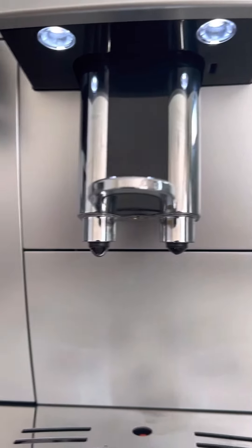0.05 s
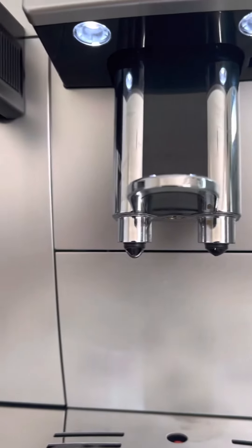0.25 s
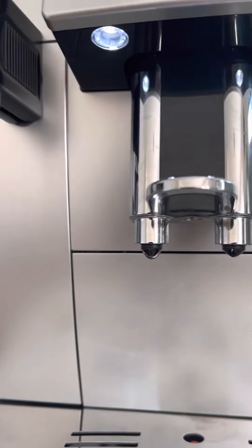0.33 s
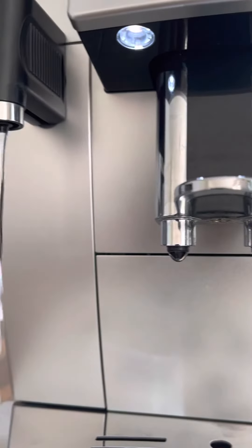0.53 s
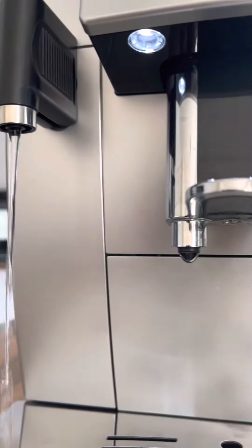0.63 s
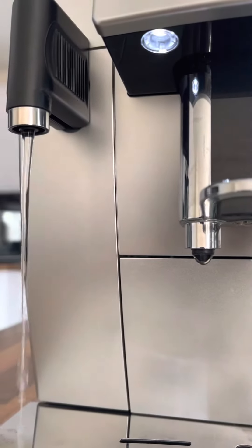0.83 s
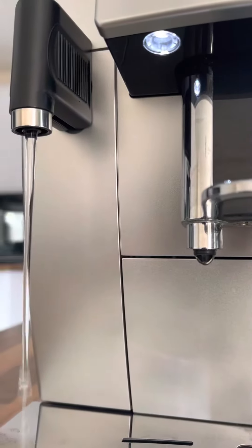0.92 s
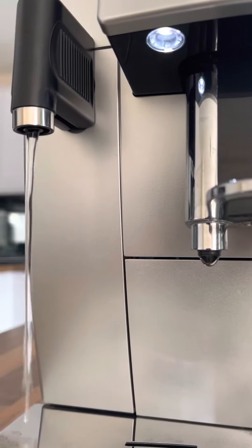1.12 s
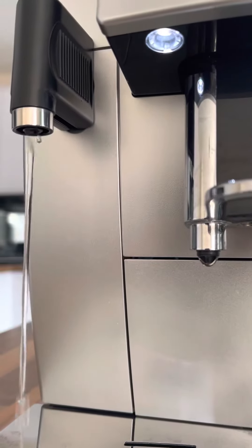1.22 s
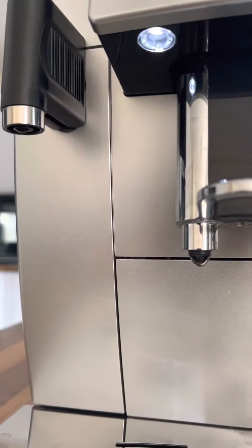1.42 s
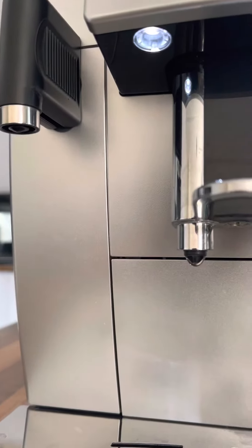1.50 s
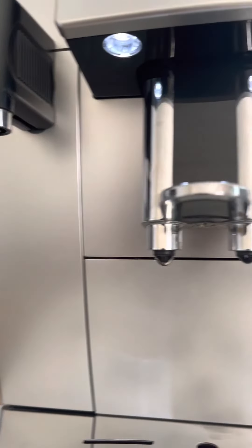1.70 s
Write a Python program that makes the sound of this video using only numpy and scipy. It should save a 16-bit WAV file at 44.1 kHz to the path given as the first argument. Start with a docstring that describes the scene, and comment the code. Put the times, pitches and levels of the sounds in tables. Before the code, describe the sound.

Heard close up in a small kitchen, a vibrating coffee machine pump hums and rattles in repeated bursts as water dribbles and the spout spits; a valve shuts with a clunk and the trickle fades.

```python
"""A kitchen, close to a coffee machine dosing hot water: its vibrating pump buzzes in short bursts.
The pump adds a humming casing to noise bursts for the piston and valve, one per mains cycle.
Water trickles as splashing noise with rising bubble tones; the spout spits wobbly rings and spray.
A valve shuts with two noisy cracks and a casing ring; dull taps and a low rumble complete the scene.
All is heard through two closely spaced microphone ports."""
import sys
import numpy as np
from scipy import signal
from scipy.fft import rfft, irfft, next_fast_len
from scipy.io import wavfile
from scipy.ndimage import map_coordinates

SR = 44100
rng = np.random.default_rng(int(sys.argv[2]) if len(sys.argv) > 2 else 0)


def wav_out(sig):
    """Save sig, one row per channel (or a flat mono array), as 16-bit PCM at SR to the path in sys.argv[1]."""
    wavfile.write(sys.argv[1], SR, np.round(np.clip(np.atleast_2d(sig).T, -1, 1) * 32767).astype(np.int16))


N = 77175
T = np.arange(N) / SR  # time of every sample, in seconds

# Pump bursts, the first already dying away: first_stroke_s, relative_level_db
PUMP_BURSTS = [(-.285, -3.5), (0.213, -2.5), (0.7128, -2.5)]
STROKES_PER_BURST, MAINS_HZ = 12, 50
# Weak first strokes, time to prime, and a plus-or-minus step that makes every second stroke stronger
SOFT_START_DB, PRIME_S, LIMP_DB = 1, .025, 1.6
SCATTER_DB, JITTER_S = 2.33, .0001  # chance in the force and timing of each stroke

# Casing hum: multiple_of_half_stroke_rate, level_db
HUM_LINES = [(2, -53), (3, -54), (4, -50), (5, -47), (6, -36), (7, -48), (8, -42), (9, -48), (10, -50),
             (11, -51), (12, -52), (14, -48), (18, -54), (20, -46), (22, -45)]
HUM_LAG_S, HUM_RISE_S, HUM_T60_S = 0.014016, 0.015, 0.33  # T60: time to fall by 60 dB
HUM_WAVER_DB, HUM_WAVERS_PER_S = 2, 25  # each line swells and sinks by itself

# Tone colour of the piston knock: pitch_hz, density_db_per_hz
PISTON_COLOUR = [(30, -27.5), (60, -16.5), (150, 3.5), (280, -4.5), (420, -4), (600, -2.5), (780, -7),
                 (1150, -8), (1700, -19), (2500, -25), (5000, -47)]
PISTON_DB, PISTON_RISE_S, PISTON_T60_S = -36, .005, 0.087
PISTON_ALIKE, PISTON_WET_DB = 0.54, -7.5  # share of power that repeats; room level
PISTON_LEAD_S = 0.0044  # the piston moves before the valve opens

# Tone colour of the valve hiss: pitch_hz, density_db_per_hz
HISS_COLOUR = [(1000, -59), (2200, -2), (2800, -1), (4400, 1), (5000, -2.5), (6200, 3), (7200, 9),
               (8200, 1.5), (9400, -3.5), (10500, 7.5), (12000, -1), (12900, -13), (13700, -67),
               (16000, -45)]
HISS_DB, HISS_RISE_S, HISS_T60_S = -37, 0.0042, 0.023
HISS_ALIKE, HISS_WET_DB = 0.16, 0

# Trickle of water over time: time_s, level_db
WATER_LEVEL = [(0, -66.5), (.06, -66.5), (.15, -60.5), (.55, -61), (.69, -67), (1.0, -59), (1.09, -63.5),
               (1.125, -52), (1.18, -63.5), (1.33, -66), (1.42, -83), (1.56, -87.5), (1.68, -75.5),
               (1.75, -80)]
# Tone colour of the splash: pitch_hz, density_db_per_hz
SPLASH_COLOUR = [(120, -6.5), (280, 3), (600, -8.5), (1000, -11), (1600, -16), (3000, -23), (6000, -29),
                 (12000, -41)]
# Middle pitch, length in starting cycles, and level below the splash
BUBBLES_PER_S, BUBBLE_HZ, BUBBLE_CYCLES, BUBBLE_DB = 750, 602, 9, -13.5

# Low rumble over time: time_s, level_db
RUMBLE_LEVEL = [(0, -52), (.05, -45), (.14, -63), (.5, -44.5), (.68, -61), (1.02, -45), (1.12, -53.5),
                (1.33, -54), (1.43, -67.5), (1.75, -67)]
# Tone colour of the rumble: pitch_hz, density_db_per_hz
RUMBLE_COLOUR = [(20, -25), (48, 5.5), (85, -2.5), (150, -1.5), (200, -9), (245, 4.5), (300, -22.5),
                 (600, -50)]
# Tone colour of the still room: pitch_hz, density_db_per_hz
AIR_COLOUR = [(30, 21), (250, -0.5), (600, -9), (1500, -13.5), (4000, -19), (11000, -13.5), (14000, -32)]
AIR_DB = -73.5

# Spits and ticks at the spout: start_s, ring_db, pitch_hz, pitch_spread_share, t60_s, spray_db
SPITS = [(0.072, -49.5, 11000, 0.046, 0.0096, -58), (.098, -43, 3677, 0.21, 0.075, -49.5),
         (.104, -41.5, 3200, 0.012, 0.036, -58), (.1185, -52, 7530, .2, 0.027, -51),
         (.1235, -47, 11070, 0.094, .02, -56.5), (.1435, -43.5, 11050, 0.12, 0.04, -57),
         (0.1732, -31.5, 9730, 0.15, 0.024, -46), (.5918, -30.5, 4600, .05, .027, -39),
         (.636, -56, 2240, .1, .04, -50), (.988, -33, 4700, .06, .028, -43),
         (1.0855, -47, 11000, .07, .014, -55), (1.663, -58, 688, 0.367, 0.043, -74.5)]
# Tone colour of the spray: pitch_hz, density_db_per_hz
SPRAY_COLOUR = [(150, -0.5), (550, 5), (1000, 3), (1600, -13.5), (2300, 4.5), (4000, 3), (8000, 2.5),
                (10500, 3), (12000, -6.5), (13200, -29), (16000, -29.5)]
SPIT_RISE_S, SPIT_WET_DB = .0007, -20

# Soft, dull taps: start_s, level_db
TAPS = [(0.4, -33.5), (.997, -40), (1.563, -68.5)]
# Tones in each tap: pitch_hz, relative_level_db, t60_s
TAP_MODES = [(626, 5.5, .022), (1120, 3.5, 0.0081), (2200, -5, .006)]

# The valve shuts, first touch then seating: start_s, relative_level_db
KNOCKS = [(1.1842, -8.5), (1.1860, -2.5)]
# Ringing tones of the casing: pitch_hz, level_db, t60_s, rise_s
CASING_MODES = [(121.5, -33, 0.19, 0.025), (170, -39.5, .2, .012), (221.4, -30.5, 0.23, 0.0047),
                (395, -21, .06, .002), (550, -29, .13, .002), (635, -20.5, .06, .001),
                (745, -26, .04, .001), (950, -25, .04, .001), (1055, -22, .04, .001),
                (2013, -48, .09, .0005), (4100, -40, .025, .0005), (4602, -32, .025, .0005)]
# Tone colour of the crack: pitch_hz, density_db_per_hz
CRACK_COLOUR = [(100, -25.5), (350, -5), (650, 14.5), (1100, 8), (1700, -7), (3000, -7.5), (5500, -12),
                (7500, -5), (9300, -5), (11300, 5), (12700, -2), (13500, -17), (15500, -17), (16500, -28)]
CRACK_DB, CRACK_T60_S, CRACK_WET_DB, RING_WET_DB = -20, 0.026, -6.5, -18

# How long the room rings: pitch_hz, t60_s
ROOM_T60 = [(60, .5), (250, 0.41), (700, 0.37), (1500, 0.19), (3500, 0.47), (7000, 0.36), (12000, 0.33)]
ROOM_BUILD_S = 0.0022
# Width of the room sound: pitch_hz, side_over_mid_db
ROOM_SIDE = [(150, -13.5), (400, -4.5), (1000, 1.5), (2000, -8), (3500, 3), (6000, -18.5), (11000, -35.5)]

# How far the left port leads the right: pitch_hz, phase_lead_radians
LEFT_LEAD = [(100, 0), (400, .1), (700, .55), (1500, 0), (2700, 0), (3600, .9), (4550, 1.7), (4950, 3.2),
             (5700, 6.2), (6500, 6.4), (8800, 9.4), (10500, 11), (12200, 12.56), (13500, 12.6),
             (15500, 15.5)]
# Loudness of the left port over the right: pitch_hz, left_minus_right_db
LEFT_TILT = [(60, -2), (160, -1), (350, -3), (750, 0.7), (1300, 1), (12000, -0.5)]
TOP_HZ = 16100


def amp(db):
    """Turn decibels into gain."""
    return 10 ** (np.asarray(db) / 20)


def unit(x):
    """Scale to an average strength (rms) of 1."""
    return x / np.sqrt(np.mean(x ** 2) + 1e-20)


def along(points, hz):
    """Read between (pitch, value) points, with pitch on a log scale."""
    pitches, values = np.transpose(points)
    return np.interp(np.log(hz + 1), np.log(pitches + 1), values)


def filtered(x, response):
    """Multiply each frequency of x by a response, which may be complex."""
    size = next_fast_len(N + SR // 2)
    hz = np.fft.rfftfreq(size, 1 / SR)
    return irfft(rfft(x, size) * response(hz), size)[..., :N]


def noise(spectrum):
    """Random noise with the given tone colour and rms 1."""
    return unit(filtered(rng.standard_normal(N), lambda hz: amp(along(spectrum, hz))))


def pulse(rise, t60):
    """Loudness curve with peak 1 that swells and dies."""
    envelope = (1 - np.exp(-T / rise)) * amp(-60 * T / t60)
    return envelope / envelope.max()


def add(out, start, x):
    """Mix x into out from a time in seconds."""
    first = max(round(start * SR), 0)
    out[first:first + len(x)] += x[:max(len(out) - first, 0)]


def room(x, wet_db):
    """Stereo: x and the kitchen's answer, each frequency dying at its own speed."""
    mid_side_noise = rng.standard_normal((2, SR * 3 // 4))
    hz, t, parts = signal.stft(mid_side_noise, SR, nperseg=256)
    parts[1] *= amp(along(ROOM_SIDE, hz))[:, None]
    decay = amp(-60 * t / along(ROOM_T60, hz)[:, None])
    tail = signal.istft(parts * decay, SR, nperseg=256)[1]
    tail = tail * (1 - np.exp(-T[:tail.shape[1]] / ROOM_BUILD_S))
    tail = tail / np.linalg.norm(tail[0])
    mid, side = signal.fftconvolve(x[None], tail, axes=1)[:, :len(x)]
    return x + amp(wet_db) * np.array([mid + side, mid - side])


def hum():
    """The strokes shake the casing: its hum builds up in each burst, wavers and rings on."""
    out = np.zeros(N)
    length = (STROKES_PER_BURST - 1) / MAINS_HZ
    phases = rng.uniform(0, 2 * np.pi, len(HUM_LINES))
    wavers = []
    for _ in HUM_LINES:
        drift = map_coordinates(rng.standard_normal(128), [T * HUM_WAVERS_PER_S], mode='wrap')
        wavers.append(amp(HUM_WAVER_DB * drift))
    for start, db in PUMP_BURSTS:
        age = np.maximum(T - start - HUM_LAG_S, 0)
        fade_db = -60 * np.maximum(age - length, 0) / HUM_T60_S
        swell = (1 - np.exp(-age / HUM_RISE_S)) * amp(db + fade_db)
        for (multiple, level), phase, waver in zip(HUM_LINES, phases, wavers):
            tone = np.sin(np.pi * MAINS_HZ * multiple * age + phase)
            out += swell * amp(level) * waver * tone
    return np.sqrt(2) * out  # a steady sine of peak 1 becomes rms 1


def strokes(spectrum, rise, t60, alike, wet_db, lead=0):
    """One short noise burst per piston stroke, partly the same each time, partly new."""
    out = np.zeros(N + SR)  # one spare second in front, for strokes before time zero
    same = noise(spectrum)
    shape = pulse(rise, t60)[:SR // 8]
    size = len(shape)
    for start, db in PUMP_BURSTS:
        fresh = noise(spectrum)
        for k in range(STROKES_PER_BURST):
            age = k / MAINS_HZ
            late, strong = rng.standard_normal(2)
            soft_db = SOFT_START_DB * np.exp(-age / PRIME_S)
            force = amp(db + SCATTER_DB * strong - soft_db + LIMP_DB * (-1) ** k)
            new = fresh[k * size:][:size]
            grain = np.sqrt(alike) * same[:size] + np.sqrt(1 - alike) * new
            add(out, 1 + start + age + JITTER_S * late - lead, force * shape * grain)
    return room(out, wet_db)[:, SR:]


def pump():
    """Every stroke knocks the piston home and forces water through the valve."""
    piston = strokes(PISTON_COLOUR, PISTON_RISE_S, PISTON_T60_S, PISTON_ALIKE, PISTON_WET_DB, PISTON_LEAD_S)
    hiss = strokes(HISS_COLOUR, HISS_RISE_S, HISS_T60_S, HISS_ALIKE, HISS_WET_DB)
    return hum() + amp(PISTON_DB) * piston + amp(HISS_DB) * hiss


def water():
    """A soft splash with small bubbles whose pitch rises."""
    bubbles = np.zeros(N)
    t = T[:SR // 16]
    for when, pitch, size in rng.random((int(BUBBLES_PER_S * N / SR), 3)):
        hz = BUBBLE_HZ * 2 ** (3 * (pitch - .5))  # spread over three octaves
        life = t * hz / BUBBLE_CYCLES
        tone = np.sin(2 * np.pi * hz * t * (1 + 0.24 * life))
        strength = size ** 2 * BUBBLE_HZ / hz  # higher bubbles tend to be weaker
        add(bubbles, when * N / SR, strength * life * np.exp(-5 * life) * tone)
    flow = amp(np.interp(T, *np.transpose(WATER_LEVEL)))
    return room(flow * (noise(SPLASH_COLOUR) + amp(BUBBLE_DB) * unit(bubbles)), wet_db=3.5)


def background():
    """A low, swelling rumble over the still room, both made of noise."""
    opposite = np.array([[1], [-1]])  # noise of opposite sign left and right gives width
    rumble = noise(RUMBLE_COLOUR) + amp(-10) * noise(RUMBLE_COLOUR) * opposite
    air = noise(AIR_COLOUR) + amp(-8) * noise(AIR_COLOUR) * opposite
    swell = amp(np.interp(T, *np.transpose(RUMBLE_LEVEL)))
    return swell * rumble + amp(AIR_DB) * air


def spits():
    """Each spit is a puff of spray and a short ring of unsteady pitch."""
    out = np.zeros(N)
    for start, ring_db, hz, spread, t60, spray_db in SPITS:
        # a new random pitch target every three cycles, joined by straight lines
        waver = map_coordinates(rng.standard_normal(N // 4), [T * hz / 3], order=1)
        phase = 2 * np.pi * np.cumsum(hz * (1 + spread * waver)) / SR
        ring = np.sqrt(2) * np.sin(phase)
        puff = amp(ring_db) * ring + amp(spray_db) * noise(SPRAY_COLOUR)
        add(out, start, pulse(SPIT_RISE_S, t60) * puff)
    return room(out, SPIT_WET_DB)


def taps():
    """Dull taps, each a few short tones, push the two ports in opposite senses."""
    out = np.zeros(N)
    tap = np.zeros(N)
    for hz, db, t60 in TAP_MODES:
        tap += amp(db) * pulse(0.0011, t60) * np.sin(2 * np.pi * hz * T)
    for start, db in TAPS:
        add(out, start, amp(db) * tap)
    return np.array([out, -out])


def valve():
    """The plunger cracks against its seat and rings the casing."""
    ring, crack, modes = np.zeros(N), np.zeros(N), np.zeros(N)
    for hz, db, t60, rise in CASING_MODES:
        modes += amp(db) * pulse(rise, t60) * np.sin(2 * np.pi * hz * T)
    for start, db in KNOCKS:
        add(crack, start, amp(db + CRACK_DB) * pulse(.0003, CRACK_T60_S) * noise(CRACK_COLOUR))
    add(ring, KNOCKS[-1][0], modes)  # the ring starts at the seating
    return room(ring, RING_WET_DB) + room(crack, CRACK_WET_DB)


def scene():
    """Add up the machine, the taps and the room around them."""
    return pump() + water() + background() + spits() + taps() + valve()


def record(dry):
    """Shift phase and level between the two ports by frequency; keep nothing from TOP_HZ up."""
    half = np.array([[.5], [-.5]])  # left gets half of each difference, right the opposite half

    def ports(hz):
        """Phase, level and band limit of both ports."""
        phase = np.exp(1j * half * along(LEFT_LEAD, hz))
        return phase * amp(half * along(LEFT_TILT, hz)) * (hz < TOP_HZ)

    return filtered(dry, ports)


dry = scene()
out = record(dry)
wav_out(out)
```